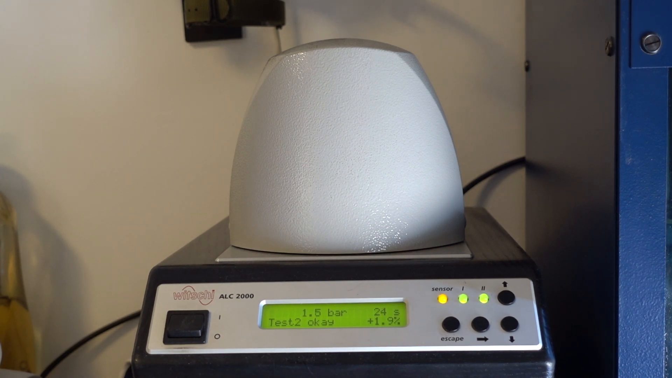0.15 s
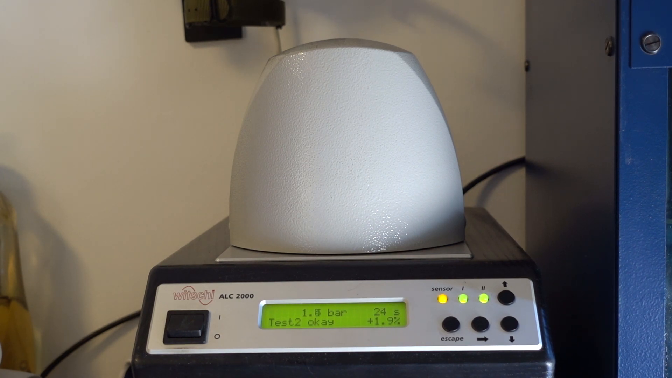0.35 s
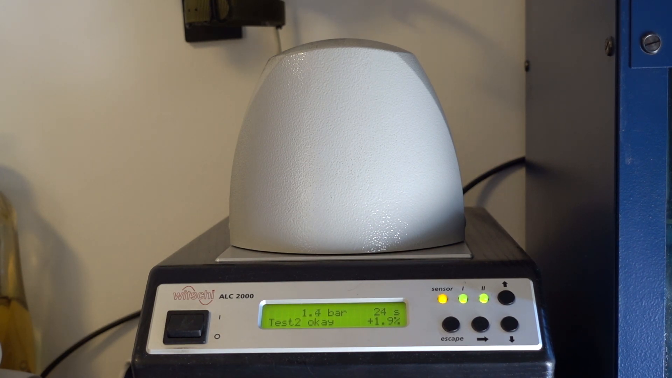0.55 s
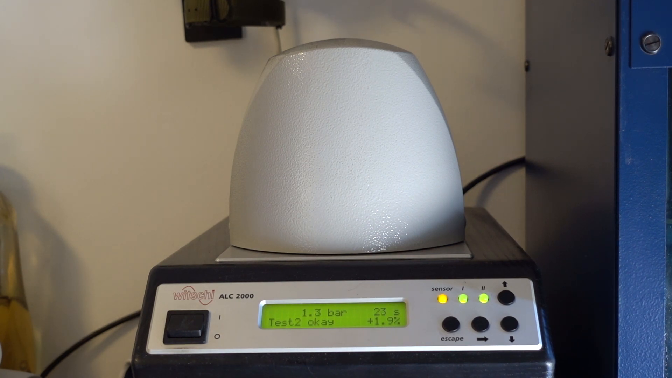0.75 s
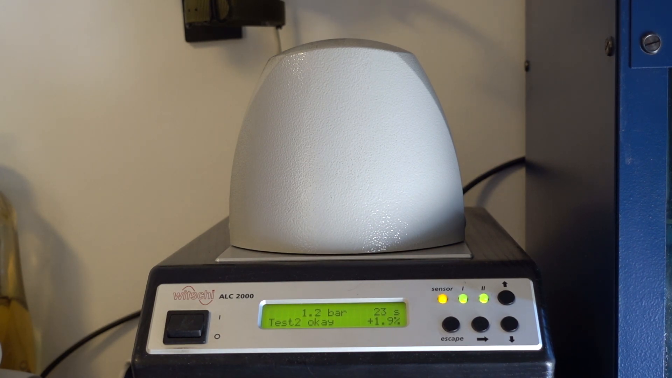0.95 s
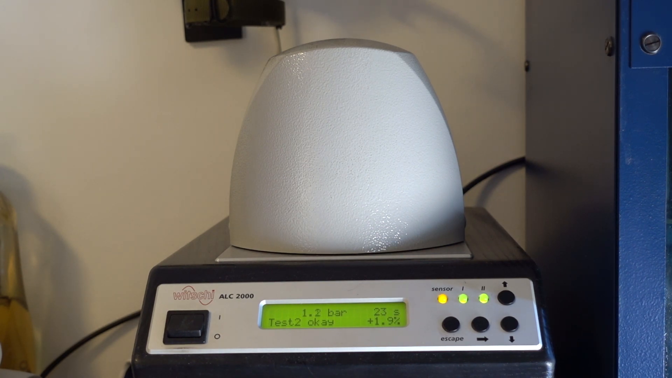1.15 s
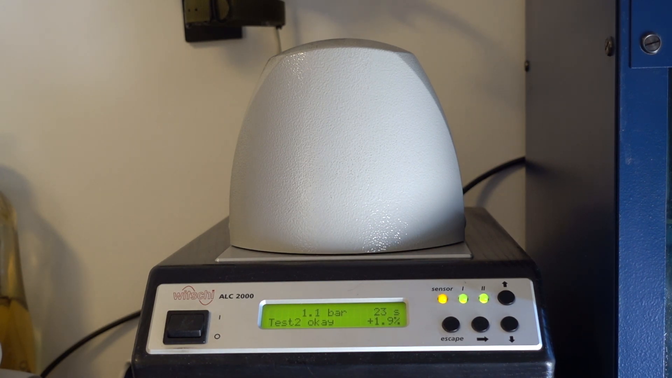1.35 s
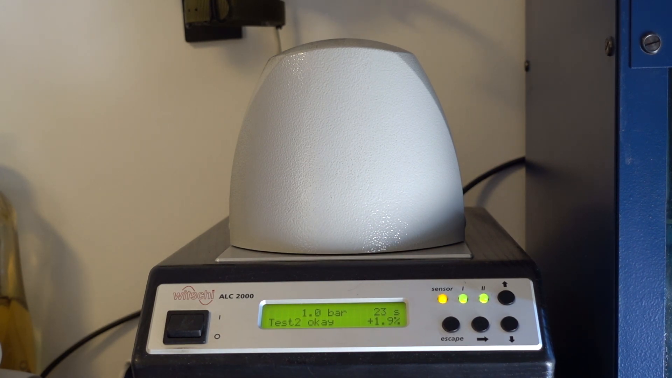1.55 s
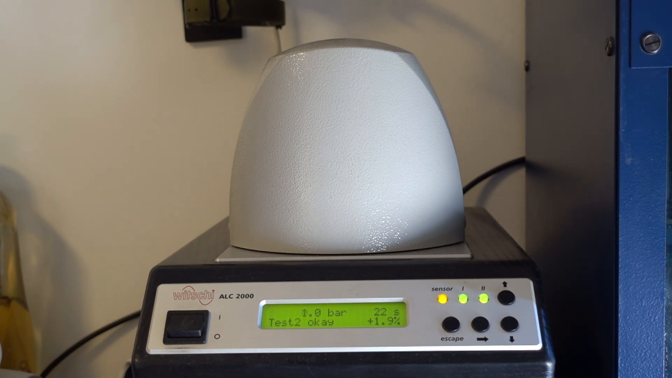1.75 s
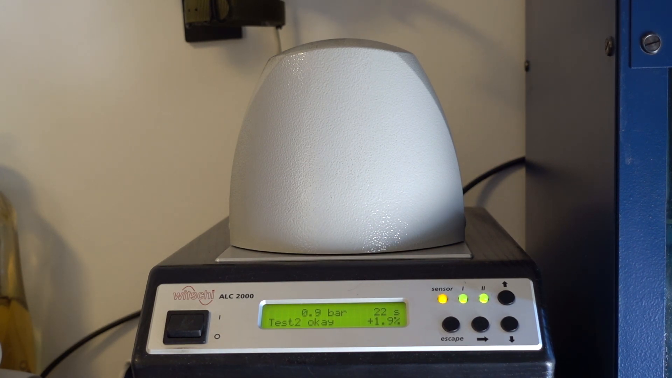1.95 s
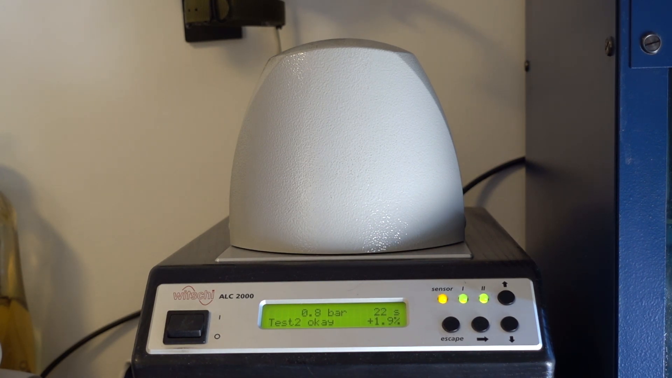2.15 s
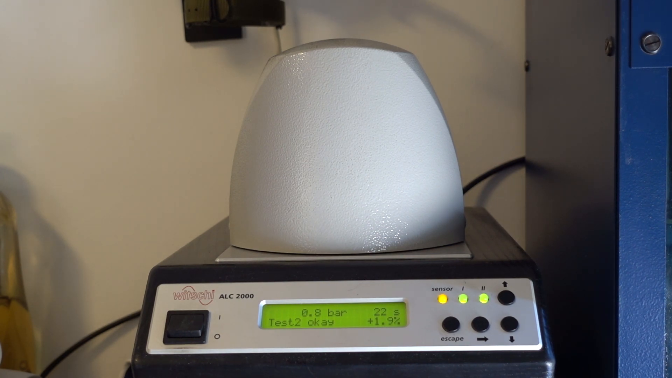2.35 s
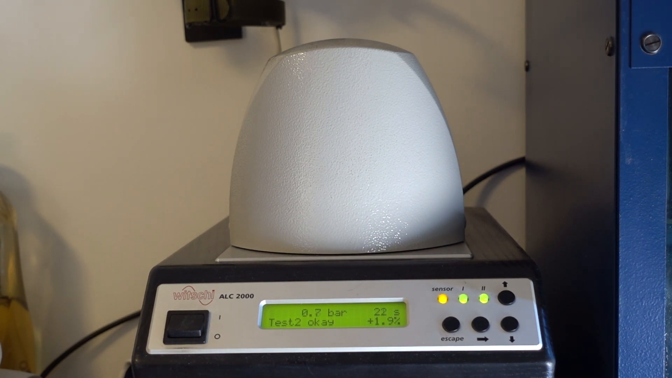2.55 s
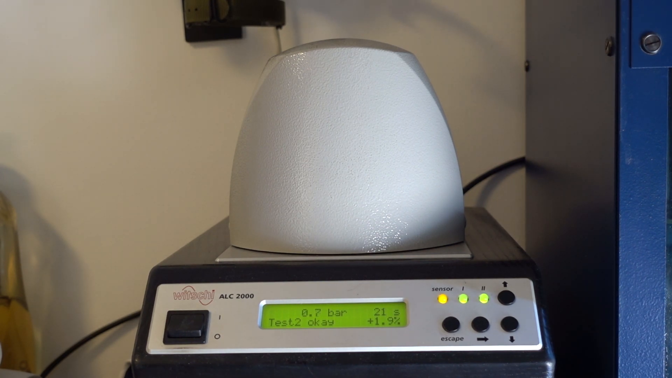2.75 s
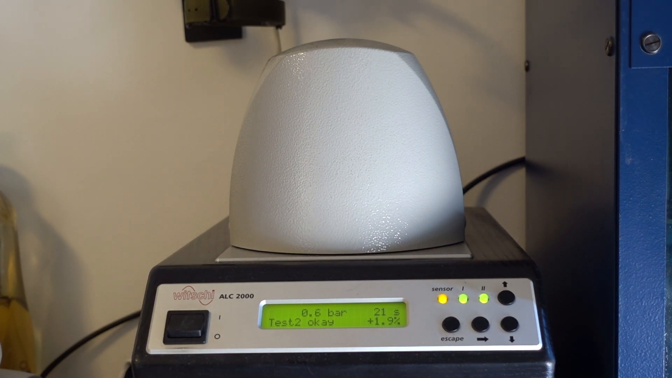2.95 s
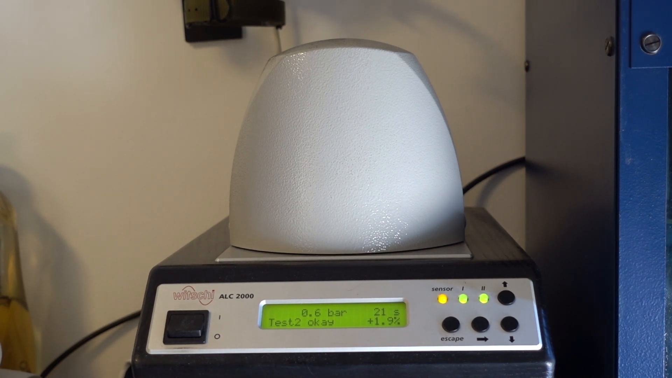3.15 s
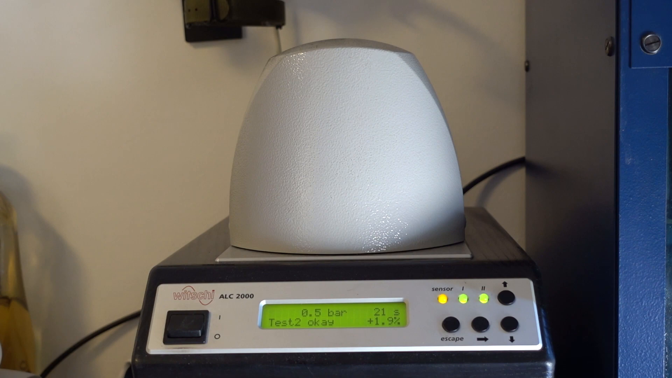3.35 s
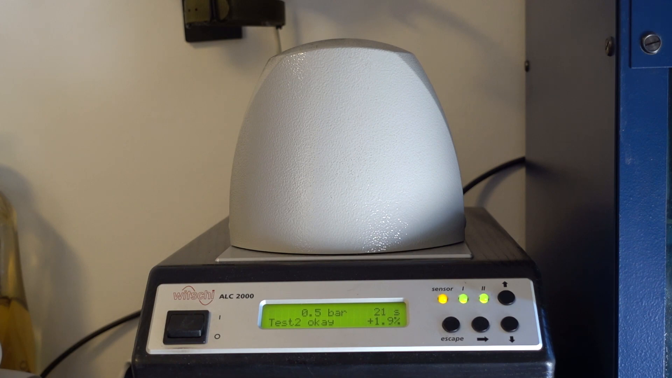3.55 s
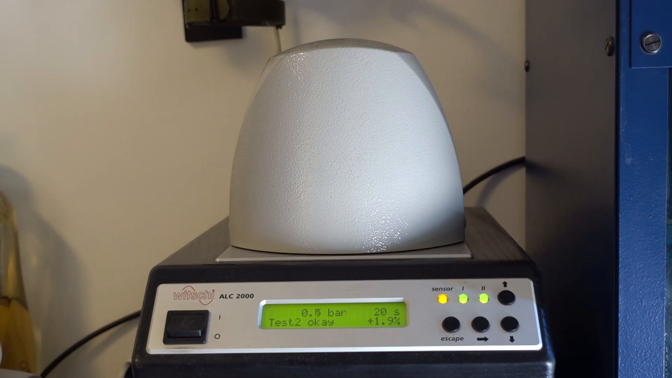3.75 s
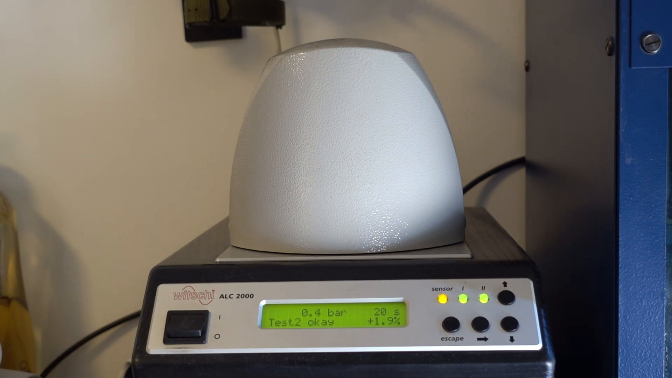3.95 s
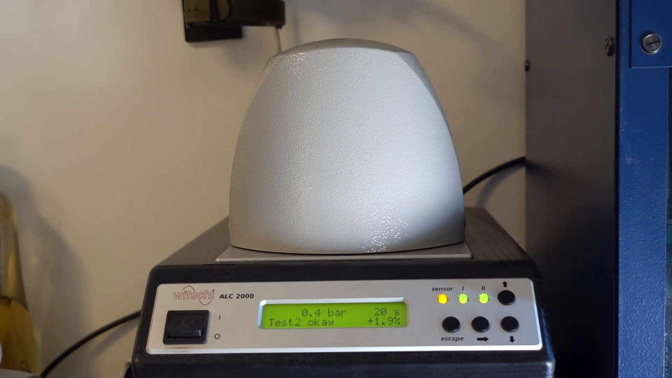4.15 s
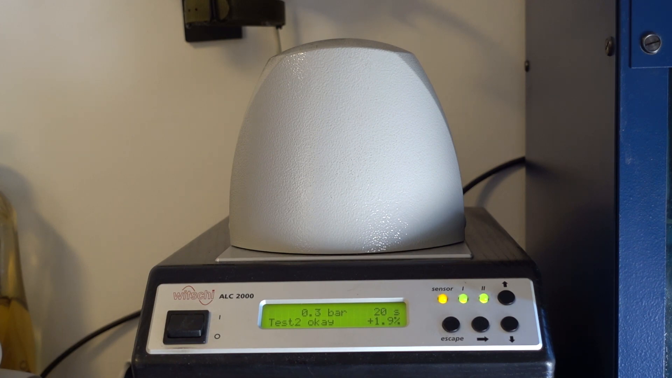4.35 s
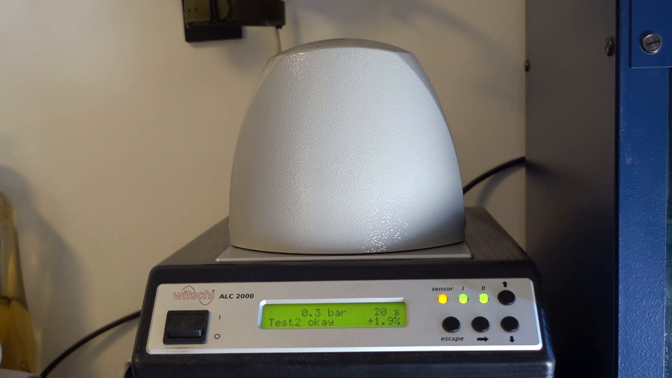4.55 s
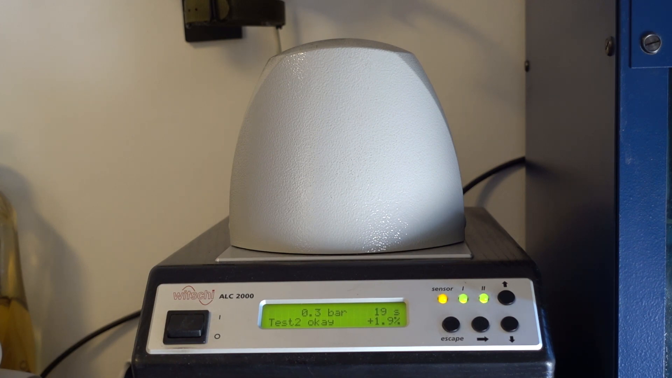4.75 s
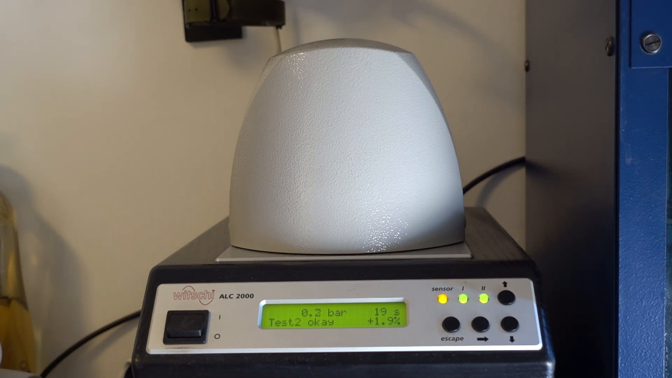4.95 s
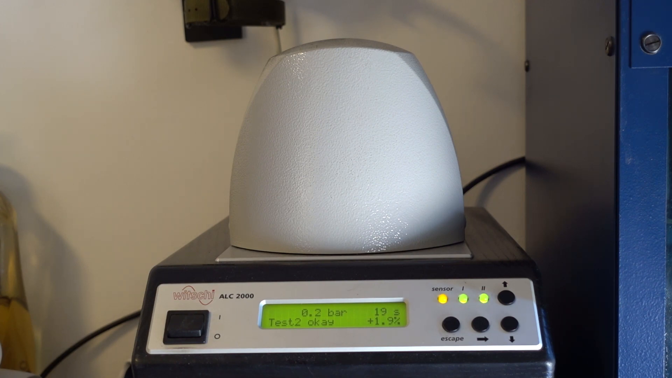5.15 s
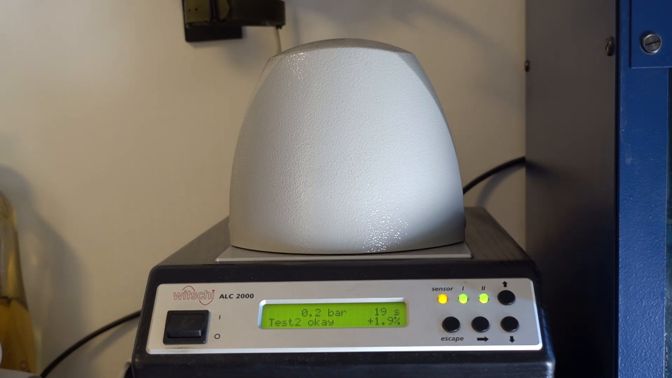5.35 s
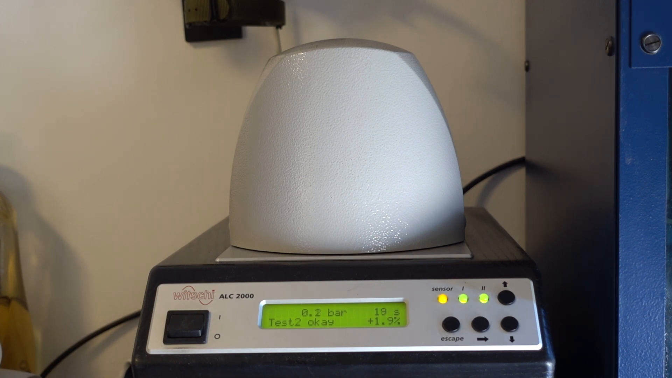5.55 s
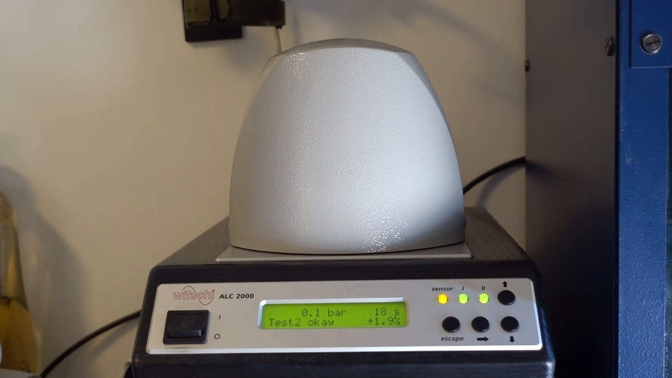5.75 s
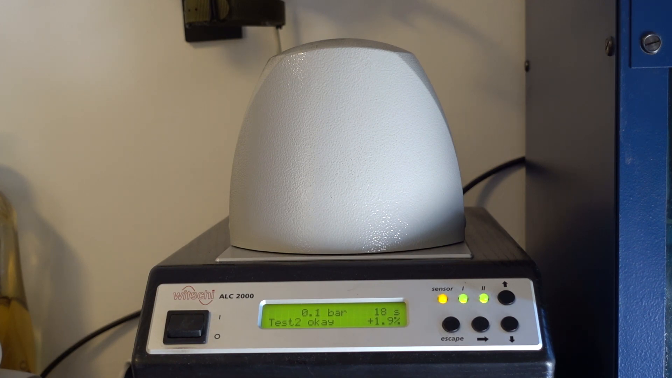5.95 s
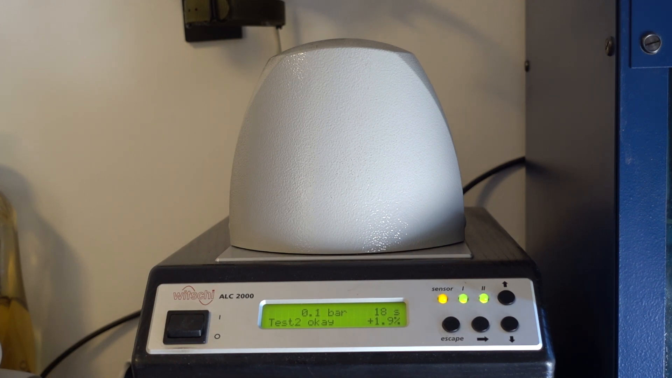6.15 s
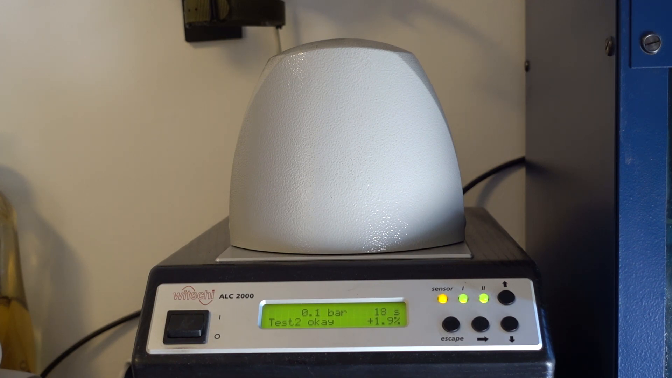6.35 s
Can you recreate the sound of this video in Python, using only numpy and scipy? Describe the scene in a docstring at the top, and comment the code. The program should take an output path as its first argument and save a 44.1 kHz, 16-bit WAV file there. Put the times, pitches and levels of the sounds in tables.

```python
"""A watch pressure tester vents its chamber on a workshop bench, in stereo from close by.
From the start a turbulent jet rings in vent and case over faint room noise, sinking as pressure drops.
Dull handling and soft padded knocks, struck wood set ringing, come in within the first second.
Near 2.8 s come low stick-slip squeaks, the first small hard ticks and a short scuff with a bright rasp.
More knocks, another squeak and close, dry ticks follow while the jet weakens."""
import sys
import numpy as np
from scipy.fft import rfft, irfft, next_fast_len
from scipy.io import wavfile

SR = 44100
rng = np.random.default_rng(int(sys.argv[2]) if len(sys.argv) > 2 else 0)


def master_out(mix):
    """Clip the mix to full scale and print it as 16-bit PCM to the path in sys.argv[1]."""
    frames = np.transpose(np.atleast_2d(mix))
    ceiling = np.clip(frames, -1, 1)
    pcm = np.round(ceiling * 32767).astype(np.int16)
    wavfile.write(sys.argv[1], SR, pcm)


N = 286605
T = np.arange(N) / SR
SIZE = next_fast_len(N + SR)  # a second of padding for the echoes
HZ = np.maximum(np.arange(SIZE // 2 + 1) * SR / SIZE, 1)
CUTOFF_HZ = 15600

# chamber pressure at first, and the time when it would be empty
START_BAR, EMPTY_S = 1.6, 7.37
JET_DB, FLOOR_DB, ROOM_T60_S = -30, -68, 0.26
# the jet's own broad peak: pitch at first, power of the pressure it follows, lift and width
PEAK_HZ, PEAK_FOLLOWS, PEAK_DB, PEAK_OCTAVES = 3480, 0.29, 5.5, 0.45
# smooth colour of the jet: (frequency [Hz], relative density [dB per Hz])
JET_COLOUR = [(150, -64), (205, -45), (240, -49), (400.0, -34), (520.0, -20.5), (800.0, -25),
              (1150.0, -21.5), (1450.0, -8.5), (2500.0, -11), (3600.0, -16.5), (6500.0, -12),
              (9500.0, -19.5), (13000.0, -13), (14500.0, -13.5), (15200.0, -38)]
# air resonances of the hollow case: (frequency [Hz], width [Hz], lift [dB])
CASE_MODES = [(270, 10, 9.5), (303, 9.2, -8), (400, 28, 4.5), (499, 20, 16), (576, 30, 12.5),
              (662, 64, 17.5), (715, 9.8, 19), (898, 35, 21.5), (933, 19, 15.5), (958, 14, 19),
              (1019, 19, 15.5), (1114, 8.8, 8.5), (1255, 25, 13.5), (1360, 37, 9.5), (1399, 10.5, 15.5),
              (1442, 8.2, 12.5), (1495, 38, 7), (1526, 20, 13), (1531, 6.5, 18), (1580, 14, 13.5),
              (1686, 8.4, 18.5), (1741, 13, 13), (1800, 12, 13), (1878.4, 32, 19.5), (1974, 67, 9),
              (2034, 14, 17), (2112, 26, 15), (2263, 11, 17.5), (2300.6, 32, 22), (2396, 30, 19.5),
              (2409, 81, 14), (2486, 20, 17.5), (2528, 17, 20), (2683, 34, 20), (2739, 19, 18.5),
              (2910, 31, 10.5), (3110, 11, 14.5), (3100, 15, 13), (3157, 16, 14), (3235, 30, 10),
              (3334, 22, 14.5), (3420, 24, 8.5), (3717, 31, 13)]
# resonances of the vent: (frequency [Hz], width [Hz], lift [dB])
VENT_MODES = [(4100, 220, 5), (4320, 77, 11.5), (4620, 72, 11), (4950, 210, 7.5), (5356, 24, 13),
              (5564, 99, 9.5), (5830, 20, 4), (5810, 80, 5), (6020, 134, 10), (6430, 220, 7),
              (6520, 110, 7), (6950, 86, 8), (7160, 260, 7.5), (8072, 85, 8), (8530, 136, 8.5),
              (9030, 35, 9), (9800, 92, 7.5), (10610, 230, 10), (10950, 51, 11.5), (11700, 67, 7),
              (12780, 74, 9), (13600, 92, 2.5), (13857, 79, 10)]
# how parts of the jet follow pressure: (centre [Hz], loss per halving [dB], loss per bar [dB/bar])
JET_PARTS = [(640, 3, 0.13), (936, 2.5, 1.5), (1170, 4, 2), (1380, 4.5, -1.3), (1750, 3.5, -0.1),
             (2310, 3, 2.5), (2650, 3.5, 1.57), (3060, 3.5, -1), (4400, 2, 8.6), (6900, 3.5, 2.83),
             (8300, 4, 0.5), (9700, 5, 1), (13000.0, 4, 2)]
# steady room noise: (frequency [Hz], relative density [dB per Hz])
FLOOR_COLOUR = [(30, -32), (100, -26), (170, -22), (240, -2), (280, 1.5), (320, -2), (450, 2.5), (900, 5),
                (3000, -15.5), (15000, -32)]

# faint dull handling: (middle [s], length [s], level before unevenness [dB])
RUSTLES = [(0.878, 0.59, -65), (1.98, 0.16, -62), (3.726, 0.72, -63.5)]
# soft knocks: (time [s], level before rise and dulling [dB], decay t60 [s], dull above [Hz])
KNOCKS = [(.725, -58.5, 0.16, 1500), (.9, -71, 0.34, 1500), (1.985, -61, 0.37, 1500),
          (2.773, -51.5, 0.25, 900), (2.835, -50, .3, 700), (2.875, -53, 0.24, 700),
          (3.716, -41, .24, 6000), (3.765, -52, .23, 3000), (4.172, -43.5, 0.25, 1200),
          (4.228, -52, 0.26, 700), (4.778, -49, 0.42, 600), (4.915, -62, .1, 500), (5.356, -51, .064, 1500)]
# colour of knocks and handling: (frequency [Hz], relative density [dB per Hz])
KNOCK_COLOUR = [(30, -44), (70, -30), (130, -17.5), (240, -7), (370, 1.5), (520, -6), (730, -4), (1100, -4),
                (1600, -13), (4000, -16), (10000, -43)]
# struck wood that rings in every knock: (frequency [Hz], width [Hz], lift [dB])
WOOD_MODES = [(140, 18, 9), (255, 38, 8), (305, 37, 4), (392, 45, 6.5), (735, 35, 11.5), (1124, 42, 11)]

# rubbing squeaks: (time [s], length [s], starting pitch before waver [Hz],
# pitch sag, negative where it rises [Hz/s], level before roughness [dB])
SQUEAKS = [(2.747, 0.057, 655, -700, -49.5), (2.836, 0.048, 439, 1000, -54), (2.935, 0.093, 500, 650, -57),
           (3.012, 0.12, 445, 1000, -55), (3.701, 0.031, 984, 4500, -48)]

# small ticks: (time [s], crack level before its modes [dB],
# rasp level against that, before halving its amplitude [dB], rasp t60 [s])
TICKS = [(2.792, -37, -1, 0.35), (2.955, -43, -4, .15), (4.987, -40, -6, 0.18), (5.008, -45, -6, .14),
         (5.976, -47, -9, 0.27), (6.324, -28.5, -19, 0.12)]
# colour of the rasp after a tick: (frequency [Hz], relative density [dB per Hz])
TICK_COLOUR = [(100, -41), (2500, -15), (5500, 0), (8000, -4.5), (15000, -8)]
# the hard part that a tick sets ringing: (frequency [Hz], relative level [dB])
TICK_MODES = [(6400, -4.5), (8300, -8), (11000, -10), (15000, -12), (3900, -14)]

# something slides briefly, pressed harder as it goes
SLIDE_S, SLIDE_ATTACK_S, SLIDE_HOLD_S, SLIDE_RELEASE_S = 2.795, 0.024, 0.2, 0.1
SLIDE_DB, SLIDE_SWELL_DB_PER_S = -42.5, 15.5  # level at first, and its rise
# colour of the slide: (frequency [Hz], relative density [dB per Hz])
SCUFF_COLOUR = [(60, -39), (160, -23), (260, -7), (700, -3.5), (1300, 1), (2500, 6), (3800, 6.5),
                (5500, -5.5), (8000, -6), (15000, -25)]
# gliding rasp of the slide: (time [s], centre [Hz], level before contact and grain [dB])
RASP = [(2.8, 3650, -66), (2.825, 3830, -52.5), (2.88, 3500, -56), (2.93, 3750, -51.5),
        (2.975, 4100, -45.5), (3.02, 4070, -45), (3.05, 3800, -54), (3.1, 3700, -62)]

# echoes from the sides, rich in treble: (frequency [Hz], level over the direct sound [dB])
SIDE_ECHOES = [(150, -25), (600, -15), (1150, -10), (1900, -12), (2700, -8.5), (3100, -2.5), (7000, -2),
               (15000, 2)]
# echoes from the front: (frequency [Hz], level against those from the sides [dB])
FRONT_ECHOES = [(2700, -10), (3800, -7), (8000, -3)]
# stereo lean, the right gets the inverse: (frequency [Hz], left gain [dB])
LEFT_LEAN = [(300, -0.19), (1000, -0.4), (2600, -0.72), (3400, 0.14), (8000, 0.49), (13000, 0.24)]


def from_db(db):
    """Decibels to gain."""
    return 10 ** (np.asarray(db) / 20)


def rms_one(x):
    """Scale to rms 1."""
    return x / np.sqrt(np.mean(x ** 2) + 1e-20)


def in_time(rows):
    """Each column of a curve at every sample."""
    s, *columns = np.transpose(rows)
    return [np.interp(T, s, column) for column in columns]


def colour(points):
    """Gain at every frequency from (frequency [Hz], level [dB]) points."""
    hz, db = np.transpose(points)
    return from_db(np.interp(np.log(HZ), np.log(hz), db))


def shaped(x, gain):
    """Filter by a gain per frequency."""
    return irfft(rfft(x, SIZE) * gain, SIZE)[..., :N]


def noise(gain):
    """Coloured noise of rms 1."""
    return rms_one(shaped(rng.standard_normal(N), gain))


def drift(rate_hz):
    """Slow random wander of rms 1."""
    return noise(1 / (1 + (HZ / rate_hz) ** 2))


def dying(start, t60):
    """Envelope that jumps to 1 and dies away, 60 dB in t60 seconds."""
    return (T >= start) * from_db(-60 * np.clip((T - start) / t60, 0, 4))


def swell(start, length):
    """Envelope that rises to 1 and falls again in one smooth arch."""
    return np.sin(np.pi * np.clip((T - start) / length, 0, 1))


def resonances(modes):
    """Gain of a resonant body: each mode lifts, or dips, the power around its frequency."""
    power = 1
    for hz, width, db in modes:
        power = power + (from_db(db) ** 2 - 1) / (1 + (2 * (HZ - hz) / width) ** 2)
    return np.sqrt(np.maximum(power, .1))


def pressure():
    """Share of pressure left: outflow goes with its square root, so it falls along a parabola."""
    return np.maximum(1 - T / EMPTY_S, .01) ** 2


def jet(flutter_db, flutter_hz, eddy_db, eddy_hz):
    """Turbulence through vent and case; bands sink at their own rates and the broad peak slides down."""
    low_cut = 1 / np.sqrt(1 + (130 / HZ) ** 4)  # so small a jet radiates little bass
    air = noise(colour(JET_COLOUR) * low_cut * resonances([*CASE_MODES, *VENT_MODES]))
    left = pressure()
    halvings = -np.log2(left)
    bars_lost = START_BAR * (1 - left)
    peak_hz = PEAK_HZ * left ** PEAK_FOLLOWS
    centres = np.transpose(JET_PARTS)[0]
    stream = 0
    for (hz, halving_db, bar_db), own in zip(JET_PARTS, np.eye(len(centres))):
        # neighbouring bands cross-fade and add up to the whole stream
        band = shaped(air, np.interp(np.log(HZ), np.log(centres), own))
        lift_db = PEAK_DB * np.exp(-(np.log2(hz / peak_hz) / PEAK_OCTAVES) ** 2)
        waver_db = eddy_db * drift(eddy_hz)  # eddies of each size come and go on their own
        loss_db = halving_db * halvings + bar_db * bars_lost
        stream = stream + from_db(lift_db + waver_db - loss_db) * band
    # the whole stream flutters a little
    return stream * from_db(JET_DB + flutter_db * drift(flutter_hz))


def room_floor():
    """Steady coloured noise of the quiet workshop."""
    return from_db(FLOOR_DB) * noise(colour(FLOOR_COLOUR))


def handling(rustle_db, thin_hz):
    """Light uneven contact with the same wood, thinned in the bass."""
    body = colour(KNOCK_COLOUR) * resonances(WOOD_MODES)
    level = sum(from_db(db) * swell(middle - length / 2, length) for middle, length, db in RUSTLES)
    texture = noise(body / (1 + (thin_hz / HZ) ** 6))
    return level * from_db(rustle_db * drift(25)) * texture


def knocks(rise_s):
    """Padded blows: a dense ring swells quickly and dies, duller the softer the contact."""
    ringing = noise(colour(KNOCK_COLOUR) * resonances(WOOD_MODES))
    thuds = 0
    for start, db, t60, dull_hz in KNOCKS:
        envelope = dying(start, t60) * np.clip((T - start) / rise_s, 0, 1)
        softened = shaped(ringing, 1 / np.sqrt(1 + (HZ / dull_hz) ** 4))
        thuds = thuds + from_db(db) * envelope * softened
    return thuds


def squeaks(wobble, rough_db):
    """Stick-slip: short thin tones that glide as the contact changes speed."""
    waver = 1 + wobble * drift(90)
    tones = 0
    for start, length, hz, sag, db in SQUEAKS:
        pitch_hz = (hz - sag * np.clip(T - start, 0, length)) * waver
        tone = np.sqrt(2) * np.sin(2 * np.pi * np.cumsum(pitch_hz) / SR)
        tones = tones + from_db(db) * swell(start, length) * tone
    return tones * from_db(rough_db * drift(90))


def ticks(crack_t60):
    """Tiny hard contacts: a sharp crack rings for a few cycles under a longer faint bright rasp."""
    crack = rasp = 0
    for start, db, tail_db, t60 in TICKS:
        ring = 0
        for k, (hz, mode_db) in enumerate(TICK_MODES):
            # alternate modes start in opposite directions
            ring = ring + (-1) ** k * from_db(mode_db) * np.sin(2 * np.pi * hz * (T - start))
        crack = crack + from_db(db) * dying(start, crack_t60) * ring
        rasp = rasp + from_db(db + tail_db) * dying(start, t60)
    return crack + .5 * rasp * noise(colour(TICK_COLOUR))


def scuff(grain_db, rasp_width_hz):
    """Uneven friction that swells until the slide stops, with a bright rasp gliding on top."""
    age = T - SLIDE_S
    stop = SLIDE_ATTACK_S + SLIDE_HOLD_S
    contact = np.interp(age, [0, SLIDE_ATTACK_S, stop, stop + SLIDE_RELEASE_S], [0, 1, 1, 0])
    rub_db = SLIDE_DB + SLIDE_SWELL_DB_PER_S * np.clip(age, 0, stop)
    rub = from_db(rub_db) * noise(colour(SCUFF_COLOUR))
    rasp_hz, rasp_db = in_time(RASP)
    # low noise times a gliding tone makes a narrow moving band
    carrier = np.sqrt(2) * np.sin(2 * np.pi * np.cumsum(rasp_hz) / SR)
    rasp = from_db(rasp_db) * noise(1 / (1 + (HZ / rasp_width_hz) ** 4)) * carrier
    return contact * from_db(grain_db * drift(40)) * (rub + rasp)


def workshop(x, near_t60, late_db):
    """Direct sound plus dense echoes of bench, wall and room; side echoes set the microphones apart."""
    near = dying(0.0011, near_t60)
    late = from_db(late_db) * dying(0.0072, ROOM_T60_S)
    echoes = rng.standard_normal((2, N)) * (near + late)
    energy = np.sum(echoes ** 2, axis=1, keepdims=True)
    front, side = rfft(echoes / np.sqrt(energy), SIZE)
    side_gain = colour(SIDE_ECHOES)
    front_gain = side_gain * colour(FRONT_ECHOES)
    # side echoes reach the two microphones with opposite sign
    paths = 1 + front_gain * front + side_gain * side * [[1], [-1]]
    return shaped(x, paths / np.sqrt(1 + front_gain ** 2 + side_gain ** 2))


def scene():
    """Jet and nearby sounds in the room, lows and mids leaning right, treble left; ticks central and dry."""
    dry = jet(flutter_db=0.42, flutter_hz=10, eddy_db=0.5, eddy_hz=9.7)
    dry = dry + room_floor()
    dry = dry + handling(rustle_db=3.0, thin_hz=220)
    dry = dry + knocks(rise_s=0.017)
    dry = dry + squeaks(wobble=0.0116, rough_db=2.0)
    dry = dry + scuff(grain_db=1.5, rasp_width_hz=930)
    lean = colour(LEFT_LEAN)
    in_room = workshop(dry, near_t60=0.041, late_db=-10.0)
    return shaped(in_room, np.array([lean, 1 / lean])) + ticks(crack_t60=0.0017)


def record(dry):
    """The top is cut steeply."""
    return shaped(dry, 1 / np.sqrt(1 + (HZ / CUTOFF_HZ) ** 200))


dry = scene()
out = record(dry)
master_out(out)
```